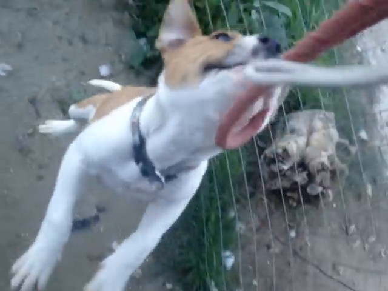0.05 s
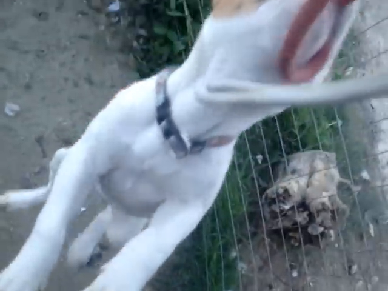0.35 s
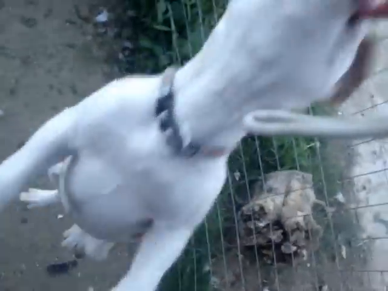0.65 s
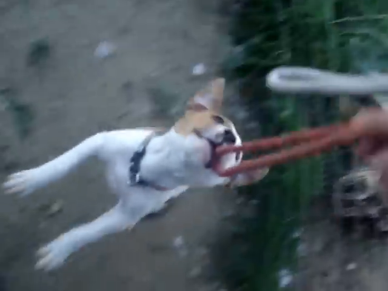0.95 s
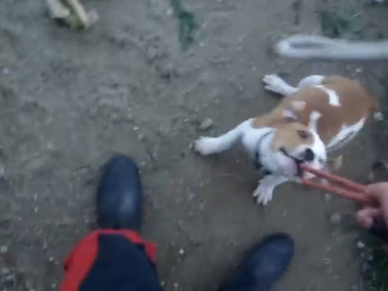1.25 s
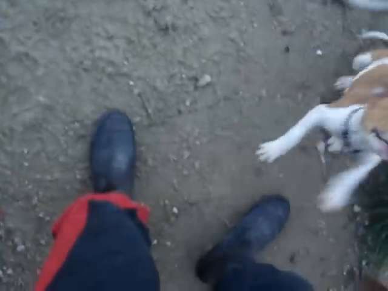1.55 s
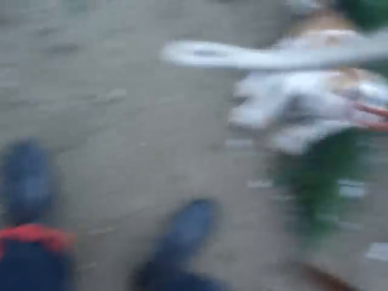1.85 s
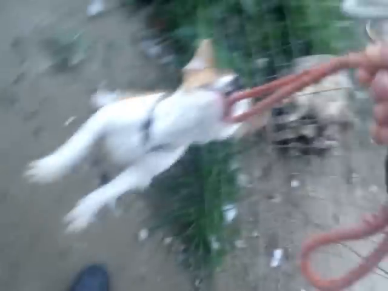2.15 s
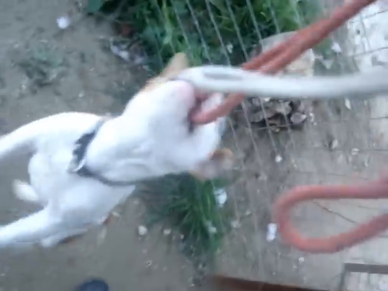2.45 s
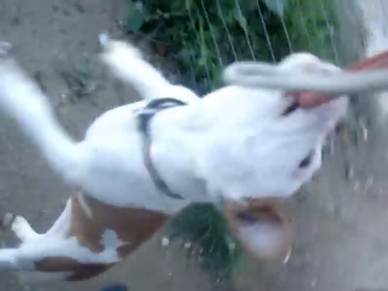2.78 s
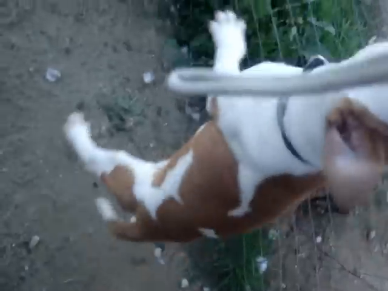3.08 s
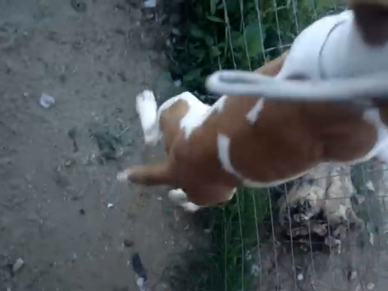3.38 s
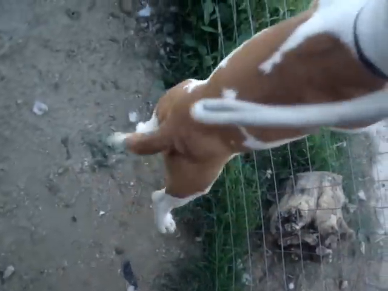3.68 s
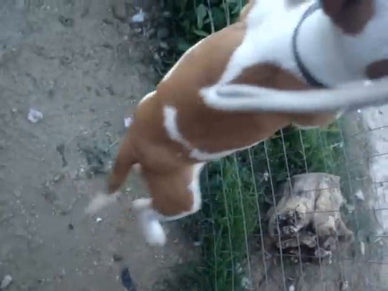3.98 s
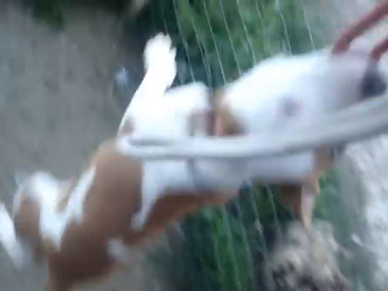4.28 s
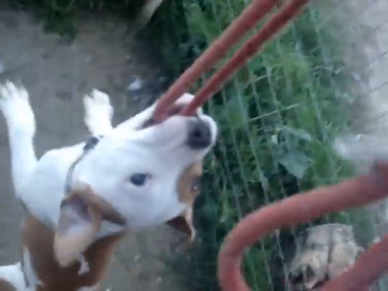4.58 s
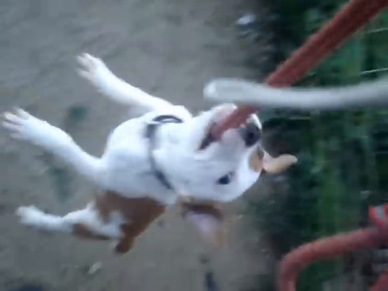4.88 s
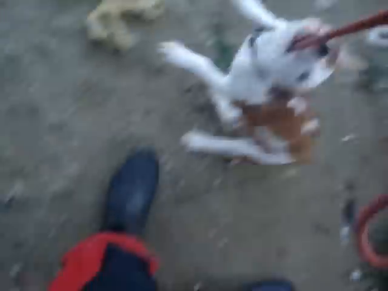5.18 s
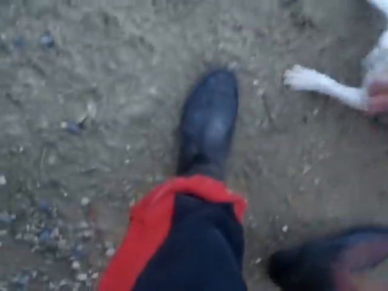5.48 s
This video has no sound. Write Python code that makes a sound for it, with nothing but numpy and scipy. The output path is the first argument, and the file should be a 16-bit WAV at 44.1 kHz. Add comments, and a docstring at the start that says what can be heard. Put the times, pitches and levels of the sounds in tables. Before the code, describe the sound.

A puppy growls close by in runs of short, raspy growls while tugging on a rope toy, snatching quick breaths in a quiet yard.

```python
"""A puppy tugs on a rope toy in a yard, close to the microphone. It snatches a wheezy breath, then
utters short growls in five long runs: its vocal folds flap at an uneven rate and ring a throat that
shifts as the jaw works on the rope. The loudest flaps overload the recorder with a low thump.
From the second run on its collar ticks now and then, and it snatches air between the later runs.
Throughout, the yard murmurs and echoes, and the recorder adds a thin whine."""
import sys
import numpy as np
from scipy import signal
from scipy.fft import rfft, irfft, next_fast_len
from scipy.io import wavfile
from scipy.ndimage import minimum_filter1d, map_coordinates

SR = 44100
rng = np.random.default_rng(int(sys.argv[2]) if len(sys.argv) > 2 else 0)


def generate_wav(sig):
    """Save sig (samples, or channels by samples) to the path in sys.argv[1] as 16-bit PCM at SR."""
    pcm = np.round(np.clip(np.atleast_2d(sig).T, -1, 1) * 32767).astype(np.int16)
    wavfile.write(sys.argv[1], SR, pcm)


N = 253134
TIME = np.arange(N) / SR


def amp(db):
    return 10 ** (np.asarray(db) / 20)


def unit_rms(x):
    return x / np.sqrt(np.mean(x ** 2) + 1e-20)


def curves(rows):
    """One value per sample for each column after the time."""
    times_s, *columns = np.transpose(rows)
    return [np.interp(TIME, times_s, column) for column in columns]


def wobble(rate_hz):
    """Smooth random curve with rate_hz knots a second."""
    return map_coordinates(rng.standard_normal(int(N * rate_hz / SR) + 4), [TIME * rate_hz])


def filtered(x, response):
    """x through a response given as a function of Hz."""
    size = next_fast_len(N + 8192)
    return irfft(rfft(x, size) * response(np.fft.rfftfreq(size, 1 / SR)), size)[:N]


def noise(spectrum):
    """Noise of rms 1 coloured by (Hz, dB) points."""
    hz, db = np.transpose(spectrum)
    colour = lambda f: amp(np.interp(np.log(f + 1), np.log(hz), db))
    return unit_rms(filtered(rng.standard_normal(N), colour))


def bursts(rows, attack_s, release_s):
    """Gain of bursts that rise, swell or sag, then fall 60 dB in release_s."""
    gain = np.zeros(N)
    for start, end, db, swell_db, *_ in rows:
        rise = np.clip((TIME - start) / attack_s + 1, 0, 1)
        hold_db = db + swell_db * (np.clip((TIME - start) / (end - start), 0, 1) - .5)
        fall_db = 60 * np.clip((TIME - end) / release_s, 0, 2)
        gain = np.maximum(gain, rise * amp(hold_db - fall_db))
    return gain


# Quick breaths. Each row: start in seconds, end in seconds, level in dB, swell in dB.
BREATHS = [(0.0, 0.16, -33, -3), (2.6, 2.82, -36, -4.5), (3.86, 4.05, -48, -2), (4.84, 5.06, -42, -13)]
# Air in the snout. Each row: frequency in Hz, relative density in dB.
SNOUT_SPECTRUM = [(120, -21.5), (300, -13), (600, -16.5), (800, -11.5), (1000, -4), (1300, -1), (1650, -12),
                  (2400, -13), (3000, -25.5), (4200, -33), (7000, -40), (10000, -52)]


def breaths():
    """Air drawn past the rope flutters in the snout."""
    air = unit_rms(noise(SNOUT_SPECTRUM) * amp(2.0 * wobble(130)))
    return bursts(BREATHS, attack_s=0.0074, release_s=0.07) * air


# Glide of the wheeze. Each row: time in seconds, pitch in Hz.
WHEEZE_PITCH = [(0.0, 905), (0.035, 864), (0.065, 914), (0.092, 980), (0.13, 970), (0.155, 940)]


def wheeze(level_db=-37, swell_db=-5, octave_db=-3.5):
    """The first breath whistles: a flickering tone and its octave."""
    pitch_hz = curves(WHEEZE_PITCH)[0] * (1 + 0.005 * wobble(120))
    phase = 2 * np.pi * np.cumsum(pitch_hz) / SR
    start, end = WHEEZE_PITCH[0][0], WHEEZE_PITCH[-1][0]
    gain = bursts([(start, end, level_db, swell_db)], attack_s=.01, release_s=.06)
    return gain * amp(5.1 * wobble(100)) * (np.sin(phase) + amp(octave_db) * np.sin(2 * phase))


# Background of the yard. Each row: frequency in Hz, relative density in dB.
YARD_SPECTRUM = [(25, -20), (75, -30), (130, -11), (260, -4.5), (420, -2.5), (560, -0.5), (1200, 5),
                 (1700, -0.5), (2400, -7), (3000, -7), (3900, -14.5), (5000, -18), (7600, -19),
                 (10000, -24.5)]


def yard_air(level_db=-42):
    """A faint, wavering outdoor murmur."""
    return amp(level_db) * noise(YARD_SPECTRUM) * amp(1.6 * wobble(8.9))


# The yard answers more as the puppy backs away. Each row: time in seconds, echo gain in dB.
ECHO_GAIN = [(0.8, -11), (1.3, -12.5), (2.0, -6), (2.4, -13.5), (3.3, -13.5), (3.7, -11), (4.2, -15.5),
             (5.2, -17), (5.6, -7.5)]


def yard_echo(x, t60_s=0.12, scatter_db=0.5, bounce_s=.0067, sway=.08):
    """A dull bounce off the wall and scatter from plants and fence; both shift as the puppy moves."""
    t = np.arange(SR // 4) / SR
    tails = rng.standard_normal((4, len(t))) * amp(-60 * t / t60_s) * (t > .003)
    paths = signal.fftconvolve(x[None], tails / np.linalg.norm(tails[0]), axes=1)[:, :N]
    shares = np.array([wobble(4.3) for _ in tails])
    scatter = (paths * shares).sum(axis=0) / np.linalg.norm(shares, axis=0)
    delay_s = bounce_s * (1 + sway * wobble(1.8))
    bounce = np.interp(TIME - delay_s, TIME, x)
    echo = filtered(0.75 * bounce + amp(scatter_db) * scatter, lambda f: 1 / (1 + (f / 3500) ** 2))
    return amp(curves(ECHO_GAIN)[0]) * echo


# Short growls. Each row: start in seconds, end in seconds, level in dB, swell in dB, flap rate in Hz,
# jitter as a share of the period, mouth-to-throat frequency ratio, teeth resonance in Hz,
# base mouth level and base teeth level in dB relative to the throat.
GROWLS = [ (0.167, 0.297, -13, 7.5, 136, 0.42, 1.83, 3420, -12, -40.5),
          (0.345, 0.351, -13.5, -1, 138.1, 0.47, 1.87, 3440, -17, -36),
          (0.381, 0.667, -13.5, -1, 142, .22, 1.66, 3270, -14.5, -31),
          (0.697, 0.989, -12.5, -3, 165.1, 0.37, 1.98, 3210, -21, -33),
          (1.000, 1.275, -17.5, -5.5, 189, 0.21, 1.71, 3370, -12.5, -27),
          (1.573, 1.700, -19.5, 5, 204.9, 0.35, 2.1, 3556, -17.5, -40),
          (1.737, 1.995, -20.5, 3.5, 185.4, 0.43, 1.91, 3885, -17.5, -40),
          (2.010, 2.259, -18, 2, 154.8, .46, 2.01, 4000, -19, -39),
          (2.28, 2.554, -13, 0, 144.7, .3, 1.97, 3760, -14.5, -31),
          (2.833, 3.068, -11.5, -0.5, 160.5, 0.4, 2.04, 4030, -21, -43),
          (3.087, 3.292, -14, 1.5, 160.9, .35, 2.09, 3290, -18.5, -39.5),
          (3.308, 3.39, -15.5, -0.5, 145.6, 0.35, 1.885, 3270, -10.5, -41),
          (3.411, 3.635, -17, 3, 144.5, 0.35, 2, 3380, -15, -34),
          (3.651, 3.814, -15, -1, 194, .14, 2.04, 3776, -15.5, -33),
          (4.077, 4.283, -14.5, 6, 140.1, .4, 2.06, 3290, -21, -39.5),
          (4.311, 4.458, -15, -1.5, 132.6, 0.48, 2.08, 3160, -20.5, -31),
          (4.475, 4.596, -12.5, -2, 148.8, .46, 1.85, 3790, -23, -47),
          (4.598, 4.816, -15, -4, 149.8, .44, 1.86, 3370, -14.5, -39),
          (5.087, 5.345, -13, -2, 170.8, .22, 1.82, 4100, -20.5, -42.5),
          (5.356, 5.456, -14.5, 2.5, 170.8, 0.27, 1.67, 3700, -20.5, -52.5),
          (5.458, 5.690, -19.5, -1, 173.2, 0.31, 2.04, 4070, -20.5, -38), ]
# The jaw tunes the throat, one list per run. Each row: time in seconds, throat resonance in Hz.
JAW_RUNS = [
    [(0.2, 1080), (0.62, 1140), (0.92, 1093), (1.1, 1256), (1.25, 1270)],
    [(1.62, 1000), (1.8, 1005), (1.95, 1016), (2.52, 1128)],
    [(2.86, 1072), (2.98, 1292), (3.15, 1063), (3.35, 1283), (3.55, 1200), (3.77, 1161)],
    [(4.12, 1118), (4.42, 1104), (4.53, 1004), (4.7, 1105)],
    [(5.11, 1303), (5.24, 1282), (5.4, 1087), (5.6, 1074)],
]


def growls(full_effort_db=-10.5):
    """Each flap of the folds lets a rasping puff through and rings the vocal tract."""
    effort = bursts(GROWLS, attack_s=0.01, release_s=.05)
    # One posture per growl, shifting in the gaps.
    postures = [(s, db + side * swell_db, *held) for start, end, db, swell_db, *held in GROWLS
                for s, side in ((start, -.5), (end, .5))]
    level_db, rate_hz, jitter, mouth_ratio, teeth_hz, mouth_db, teeth_db = curves(postures)
    throat_hz, = curves([point for run in JAW_RUNS for point in run])
    # A slacker growl is chestier and airier.
    slack_db = full_effort_db - level_db
    chest_db = -27.5 + 1.5 * slack_db
    rasp_share = np.clip(0.15 + 0.14 * slack_db, 0, 1)
    flaps = fold_flaps(rate_hz, jitter, onsets_s=[row[0] for row in GROWLS])
    source = np.sqrt(1 - rasp_share) * unit_rms(flaps) + np.sqrt(rasp_share) * rasp(flaps)
    shape = throat_hz, mouth_ratio * throat_hz, teeth_hz, chest_db, mouth_db, teeth_db
    return effort * steady(vocal_tract(source, flaps, effort, shape), span_s=0.055)


# Hard catches of the throat. Each row: time in seconds, level in dB over an ordinary flap.
THROAT_CATCHES = [(0.208, 10.5), (0.268, 11), (0.288, -0.5), (0.731, 1), (0.757, 3.5), (1.866, 7.5),
                  (2.34, 2.5), (2.38, 10.5), (2.855, 22), (2.889, 9), (2.927, 3.5), (3.19, 7.5), (3.21, 3),
                  (3.546, 7.5), (4.167, -2.5), (4.273, 9), (4.545, 2.5), (4.757, 7), (5.121, 9.5),
                  (5.133, 11), (5.156, 5), (5.398, 7.5), (5.516, 5)]


def fold_flaps(rate_hz, jitter, onsets_s, scatter_db=2.5, onset_db=0.5, stall_s=0.011, rest_s=.006):
    """Uneven closures of the folds; they stall before each catch and rest briefly after it."""
    flaps, at = np.zeros(N), 0
    for timing, strength in rng.standard_normal((1500, 2)):
        stretch = np.exp(jitter[at] * timing - jitter[at] ** 2 / 2)
        at += int(SR / rate_hz[at] * stretch) + 1
        if at >= N:
            break
        flaps[at] = amp(scatter_db * min(strength, 1.2))
    opening_catches = [(s, onset_db) for s in onsets_s]
    for s, db in opening_catches + THROAT_CATCHES:
        at = round(s * SR)
        flaps[at - round(stall_s * SR):at + round(rest_s * SR)] = 0
        flaps[at] = amp(db)
    return flaps


def rasp(flaps, decay_s=.003):
    """A puff of noisy air dies away after each flap."""
    puffs = signal.lfilter([1], [1, -np.exp(-1 / (decay_s * SR))], flaps)
    return unit_rms(puffs * rng.standard_normal(N))


def vocal_tract(source, flaps, effort, shape, flutter_db=2.0, hop=192, fft_size=1024):
    """Chest, throat, mouth and teeth resonate; a harder flap is brighter and snaps more.
    The loudest also overload the recorder with a low thump."""
    split = lambda x: np.pad(x, (0, -N % hop)).reshape(-1, hop)
    blocks = split(source)
    throat_hz, mouth_hz, teeth_hz, chest_db, mouth_db, teeth_db = [curve[::hop] for curve in shape]
    hard_db = 20 * np.log10(np.minimum(split(flaps).max(axis=1), 1.7) + 0.24)
    loud_db = np.minimum(20 * np.log10(effort[::hop] + 1e-6) + 14, 2)
    # The soft walls shake from block to block.
    shake = lambda: np.exp(.02 * rng.standard_normal(len(blocks)))
    flutter = lambda: flutter_db * rng.standard_normal(len(blocks))
    overload_thump_db = -39.5 + 0.7 * hard_db + 1.8 * loud_db
    snap_db = -47.5 + 1.27 * hard_db + 2.2 * loud_db
    modes = [(210 * shake(), 300, overload_thump_db, 2.1),
             (640 * shake(), 520, chest_db + flutter(), 2.6),
             (throat_hz * shake(), 400, np.zeros(len(blocks)), 2.6),
             (mouth_hz * shake(), 920, mouth_db + 0.34 * hard_db + flutter(), 3.6),
             (teeth_hz * shake(), 1050, teeth_db + 1.65 * hard_db + flutter(), 2.8),
             (4500 * shake(), 3600, snap_db + flutter(), 2.2)]
    rung = irfft(rfft(blocks, fft_size) * resonances(modes, fft_size), fft_size)
    positions = hop * np.arange(len(blocks))[:, None] + np.arange(fft_size)
    return np.bincount(positions.ravel(), rung.ravel())[:N]  # overlap-add


def resonances(modes, fft_size):
    """One minimum-phase response per block, from spectral humps whose powers add."""
    hz, power = np.fft.rfftfreq(fft_size, 1 / SR), 0
    for centre_hz, width_hz, db, steepness in modes:
        hump = (1 + (2 * (hz - centre_hz[:, None]) / width_hz) ** 2) ** -steepness
        power = power + amp(db)[:, None] ** 2 * hump / hump.sum(axis=1, keepdims=True)
    cepstrum = irfft(np.log(power + 1e-14) / 2, fft_size)
    cepstrum[:, 1:fft_size // 2] *= 2
    cepstrum[:, fft_size // 2 + 1:] = 0
    return np.exp(rfft(cepstrum))


def steady(x, span_s):
    """x held near rms 1 over span_s; single pulses keep their shape."""
    window = np.hanning(int(span_s * SR))
    power = np.abs(signal.fftconvolve(x ** 2, window / window.sum(), "same"))
    return x / np.sqrt(power + 1e-4 * np.mean(x ** 2))


# Collar ticks. Each row: time in seconds, envelope peak in dB.
COLLAR_TICKS = [(2.0037, -33.5), (2.526, -39.5), (2.5692, -31.5), (5.6314, -45.5)]


def collar(decay_s=0.0012):
    """The collar gives small, high, quickly damped ticks."""
    touches = sum(amp(db) * np.exp(-np.abs(TIME - s - .002) / decay_s) for s, db in COLLAR_TICKS)
    return touches * noise([(4500, -36), (6300, -6.5), (7000, 5), (7800, -7.5), (9500, -33.0)])


def limiter(x, ceiling=.8, hold_s=0.001, lookahead_samples=6):
    """Gain drops at once on a loud peak, with a tiny click, and holds for a moment."""
    size = 2 * round(hold_s * SR / 2) + 1
    needed = np.minimum(1, ceiling / (np.abs(x) + 1e-9))
    return x * minimum_filter1d(needed, size, origin=size // 2 - lookahead_samples)


def scene():
    """The puppy, its echo and the air of the yard, in mono."""
    puppy = growls() + breaths() + wheeze() + collar()
    air = yard_air()
    return (puppy + yard_echo(puppy) + air)[None]


def record(dry, cutoff_hz=10100):
    """The recorder limits the loudest flaps, thins the bass, whines and cuts the top treble."""
    bass_cut = lambda f: (1j * f / (135 + 1j * f)) ** 2 * 1j * f / (45 + 1j * f)
    thinned = filtered(limiter(dry[0]), bass_cut)
    whine_hz = 7582 + 16 * wobble(70)
    whine = amp(-58 + 2 * wobble(90)) * np.sin(2 * np.pi * np.cumsum(whine_hz) / SR)
    return filtered(thinned + whine, lambda f: f < cutoff_hz)[None]


dry = scene()
out = record(dry)
generate_wav(out)
```